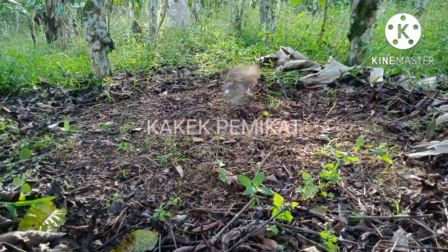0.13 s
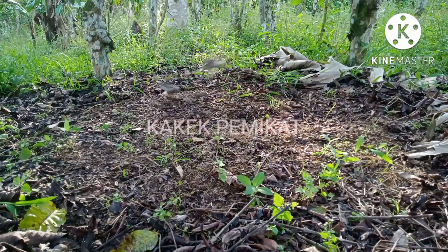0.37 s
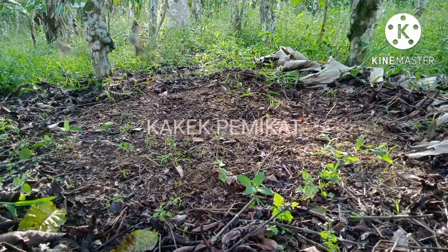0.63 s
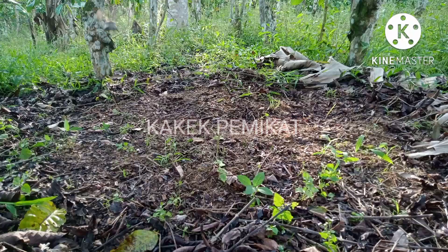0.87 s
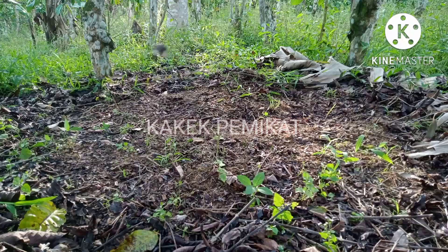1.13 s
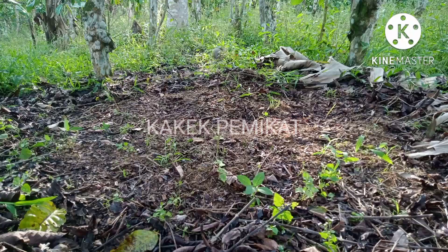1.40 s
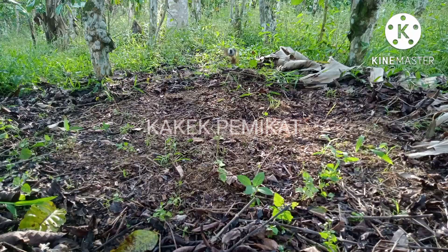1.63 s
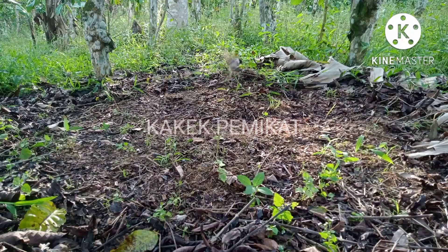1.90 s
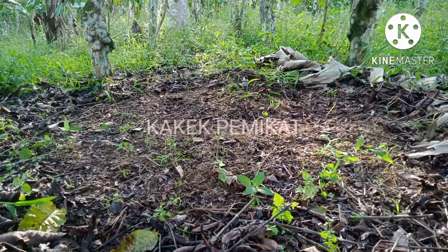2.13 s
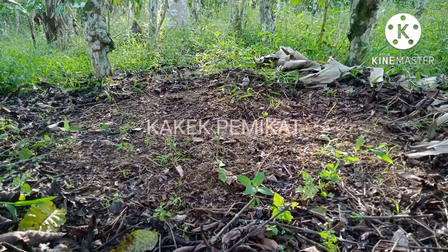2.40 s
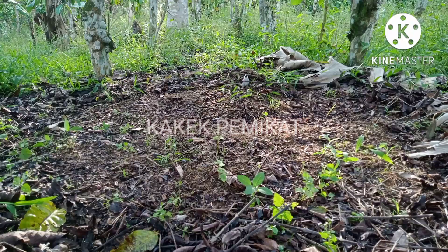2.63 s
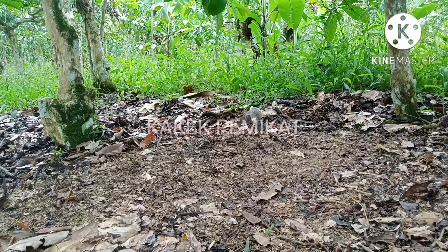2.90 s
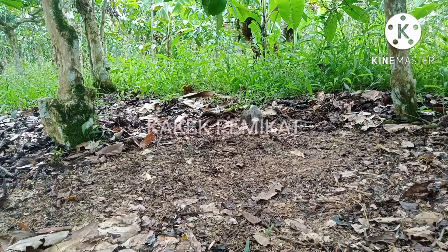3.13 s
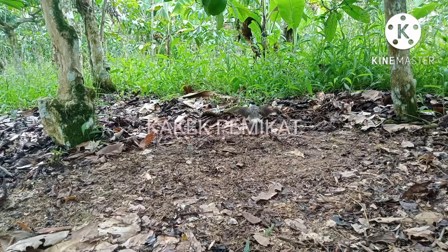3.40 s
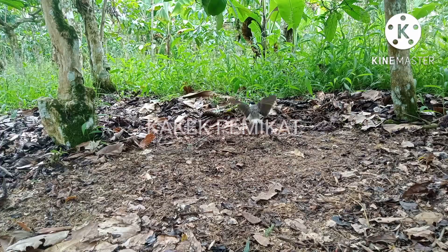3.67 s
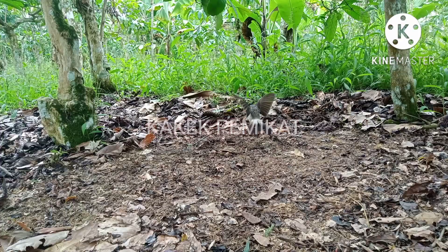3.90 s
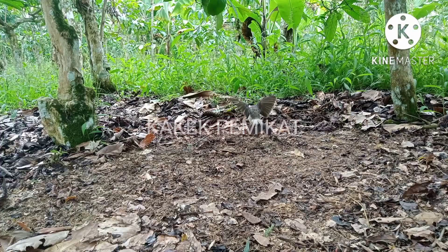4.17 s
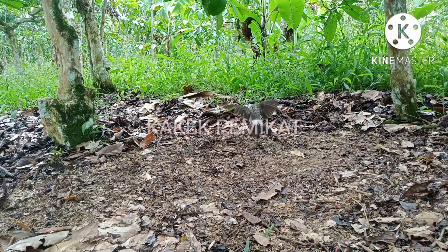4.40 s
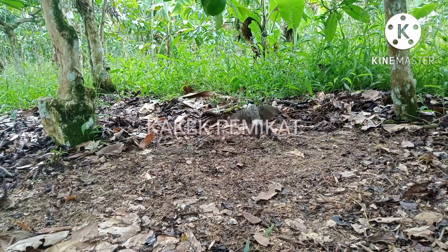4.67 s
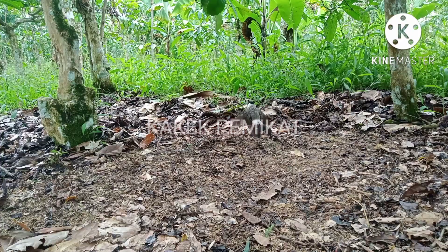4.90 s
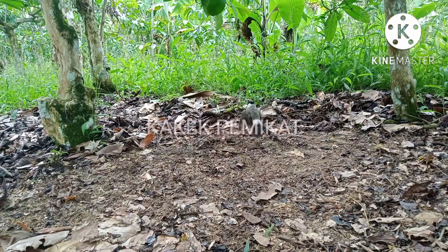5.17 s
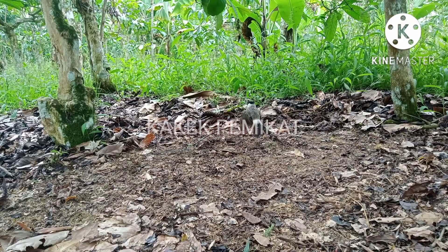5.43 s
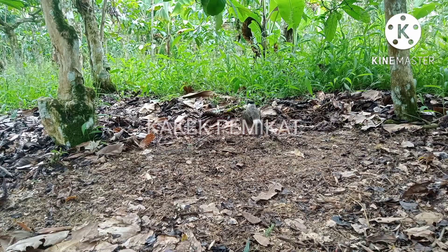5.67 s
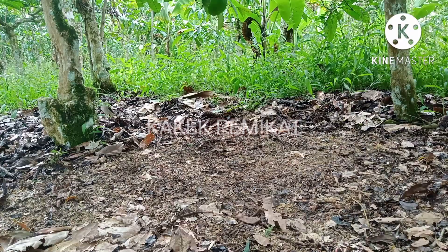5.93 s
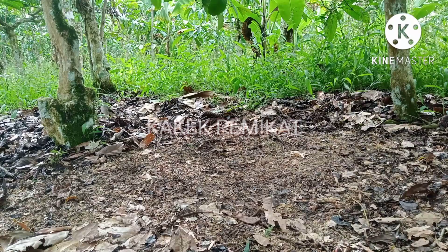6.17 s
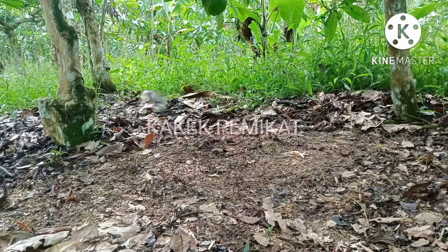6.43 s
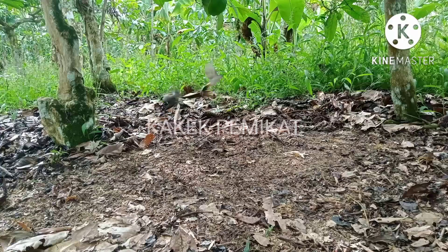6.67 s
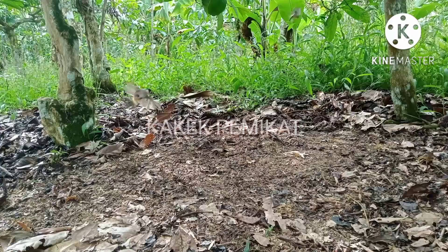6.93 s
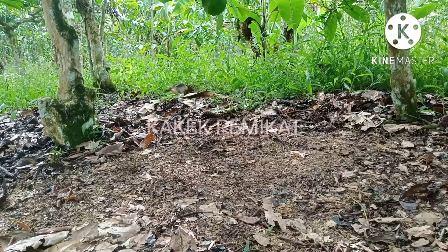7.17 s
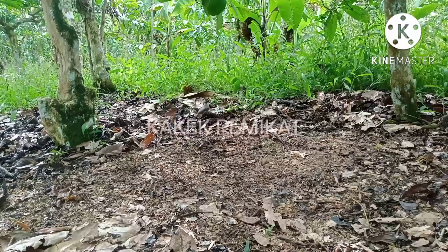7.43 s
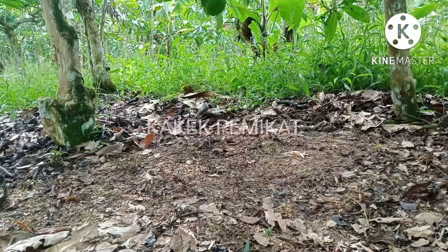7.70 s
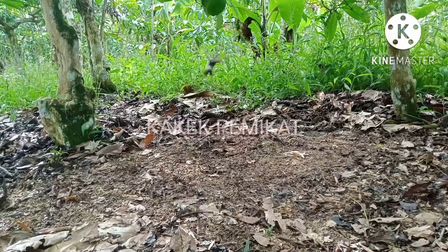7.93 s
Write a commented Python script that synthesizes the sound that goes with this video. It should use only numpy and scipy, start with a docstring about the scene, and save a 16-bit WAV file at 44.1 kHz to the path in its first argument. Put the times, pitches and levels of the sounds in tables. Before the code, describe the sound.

Small birds flutter and chatter harshly in dry leaves, then one sings seven loud sharp whistled phrases before wings flap again, over a distant thumping engine.

```python
"""In a wooded clearing, small birds squabble close to the microphone on dry leaves.
Buzzy chatter is a trilled pitch with a second voice; wings and feet are filtered crackle with decaying beats.
One bird then sings seven loud phrases, made of gliding harmonics shaped by a throat.
Far off, a single-cylinder engine thumps as resonating pulses; other birds whistle in the trees.
Cicadas and the forest wash are shaped noise, and a cricket chirps in pairs of rising pips."""
import sys
import numpy as np
from scipy import signal
from scipy.fft import rfft, irfft, next_fast_len
from scipy.io import wavfile
from scipy.ndimage import uniform_filter1d

SR = 44100
rng = np.random.default_rng(int(sys.argv[2]) if len(sys.argv) > 2 else 0)


def wav_out(sig):
    """Save sig, one row per channel (or a flat mono array), as 16-bit PCM at SR to the path in sys.argv[1]."""
    wavfile.write(sys.argv[1], SR, np.round(np.clip(np.atleast_2d(sig).T, -1, 1) * 32767).astype(np.int16))


def rack_gain(trim_db):
    """Turn a fader trim in dB into the linear factor to multiply a signal by."""
    fader = np.asarray(trim_db, float)
    return 10 ** (fader / 20)


N = 355578  # samples

# background, ahead of any gain: (t/s, forest wash level/dB, cicadas level/dB,
# thin insect lines level/dB, stirring leaves level/dB)
AIR = [(0, -46.5, -50, -50.5, -62), (1, -47.5, -54.5, -53.5, -61), (2.3, -48, -53.5, -51.5, -56.5),
       (2.4, -54, -59.5, -59.5, -79), (2.7, -49, -53, -45, -57.5), (3.15, -45, -50, -60.5, -73),
       (3.25, -60.5, -60, -71, -95.5), (5, -61, -58.5, -68, -94), (5.6, -54, -55.5, -72, -95),
       (6.3, -59, -61, -72, -85), (7.2, -58.5, -60.5, -72.5, -63), (8.06, -58, -62.5, -66, -75)]


def evened(x):
    """Scales to rms 1."""
    return x / np.sqrt(np.mean(x ** 2) + 1e-20)


def read(points, hz):
    """Reads a spectrum on a log frequency axis."""
    f, value = np.transpose(points)
    return np.interp(np.log(hz + 1), np.log(f + 1), value)


def curves(rows, t=None):
    """Columns of a table at the times t, or at every sample of the scene."""
    s, *columns = np.transpose(rows)
    t = np.arange(N) / SR if t is None else t
    return [np.interp(t, s, c) for c in columns]


def add(mix, s, sound):
    """Mixes a sound in at s seconds."""
    part = mix[round(s * SR):][:len(sound)]
    part += sound[:len(part)]


def coloured(x, points):
    """Shapes x by a spectrum."""
    size = next_fast_len(len(x))
    gain = rack_gain(read(points, np.fft.rfftfreq(size, 1 / SR)))
    return irfft(rfft(x, size) * gain, size)[:len(x)]


def resonate(x, hz, width):
    """Shifts hz down to zero, smooths, shifts back: a resonance that may move."""
    turn = np.exp(2j * np.pi * np.cumsum(hz * np.ones(len(x))) / SR)
    r = np.exp(-np.pi * width / SR)
    return 2 * (turn * signal.lfilter([1 - r], [1, -r], x / turn)).real


def wander(length, size):
    """Smooth random drift of rms 1, averaged twice over size samples."""
    smooth = uniform_filter1d(rng.standard_normal(length), size)
    return evened(uniform_filter1d(smooth, size))


def voice(hz, throat, count, fuzz):
    """Harmonics of a moving pitch through the throat; the higher ones flutter."""
    turns = np.cumsum(hz) / SR
    gains = np.array([rack_gain(read(throat, k * hz)) * (k * hz < SR / 2) for k in range(1, count + 1)])
    wave = 0
    for k, gain in enumerate(gains):
        flutter = 1 + fuzz * k * wander(len(hz), size=30)
        wave = wave + gain * np.sin(2 * np.pi * (k + 1) * turns) * flutter
    return wave / np.sqrt((gains ** 2).sum(0) / 2)


def note(rows, rough, count=7, breath_db=10.5):
    """A whistle; rough shakes pitch and level and lets air hiss through the beak."""
    # resonance of the singing throat: (f/Hz, level/dB)
    song_throat = [(1200, -25.5), (1600, -23), (2200, 4.5), (2900, 12), (4200, -0.5), (4800, -14),
                   (5600, -21), (7000, -35.5), (9000, -28.5), (11000, -41), (15000, -43.5)]
    t = np.arange(rows[0][0], rows[-1][0], 1 / SR)
    hz, db = curves(rows, t)
    hz = uniform_filter1d(hz, size=60) * (1 + rough * 0.087 * wander(len(t), size=25))
    wave = voice(hz, song_throat, count=count, fuzz=0.53)
    wave = wave * (1 + rough * wander(len(t), size=40))
    hiss = evened(resonate(resonate(rng.standard_normal(len(t)), 9800, 1900), 8800, 1500))
    sound = wave + rack_gain(breath_db) * rough ** 2 * hiss
    return t[0], rack_gain(db) * sound * signal.windows.tukey(len(t), min(1, 400 / len(t)))


def song():
    """Lead notes scoop up and leap; a loud whistle keeps one shape, stretched anew in each phrase."""
    # lead notes: (t/s, length/s, scoop level/dB, hold level/dB, hold f/Hz, roughness 0-1)
    leads = [(3.123, 0.041, -32.5, -34, 2100, 0.14), (3.163, 0.018, -20.5, -29.5, 1974, .05),
             (3.344, .047, -31.5, -24.5, 2034, 0.15), (3.403, .036, -27, -11, 2956, 0),
             (3.587, 0.053, -23.5, -27.5, 2110, 0.19), (3.647, 0.038, -27.5, -15.5, 2904, 0.08),
             (3.856, 0.046, -23.5, -25.5, 2150, 0.21), (3.921, 0.039, -26, -16.5, 2990, 0.08),
             (4.129, 0.047, -25, -22.5, 2830, 0.23), (4.196, 0.049, -29, -18.5, 2975, 0.02),
             (4.412, 0.057, -23, -24, 2990, 0.25), (4.484, 0.04, -27, -16.5, 2995, 0.09),
             (4.711, 0.042, -25.5, -23.5, 2950, 0.29), (4.778, 0.04, -30, -18.5, 2930, 0),
             (6.261, 0.045, -59, -51.5, 2170, .1)]
    # scoop that opens a lead note: (t into the note/s, f/Hz, level above the scoop level/dB)
    scoop_shape = [(-.003, 1442, -14.5), (.005, 1760, 1), (.013, 2026, -1.5)]
    # shape of the loud whistle: (place: -1 grace note, 0 attack, 1 top, 2 end;
    # pitch as share of the top, level ahead of the effort/dB)
    refrain = [(-1, .525, -31.5), (-.55, .6, -26.5), (-.12, .63, -31.5), (0, .815, -11.5),
               (.15, .895, -9.5), (.4, .74, -18.5), (.54, 0.6, -32.5), (.68, .82, -10.5), (.83, 0.97, -8),
               (1.003, 0.99, -11), (1.2, 0.95, -9.5), (1.42, .865, -13), (1.58, .76, -20.5),
               (1.68, .81, -14.5), (1.845, .815, -10.5), (2, 0.68, -26)]
    # phrases: (attack t/s, top t/s, end t/s, top f/Hz, effort level/dB: grace note, top, end)
    refrains = [(3.183, 3.214, 3.272, 3420, -9, 0.47, -5.5), (3.445, 3.464, 3.507, 3370, -5, 0, 1.5),
                (3.707, 3.734, 3.788, 3473, -2, 0.62, 0), (3.984, 4.008, 4.063, 3480, 0.5, 0.54, -2),
                (4.264, 4.287, 4.345, 3466, -0.5, 0.13, -2), (4.547, 4.573, 4.633, 3437, -1.5, 0.72, -1.5),
                (4.844, 4.867, 4.925, 3470, -0.5, -0.5, 3.5)]
    leap_s, hold, sag = .016, .72, .76  # hold: share of the length; sag: share of the hold pitch
    droop_db, fade_db = -2, -16
    grace_s, leap_gap_s = .026, .003  # both ahead of the attack
    out = np.zeros(N)
    for s, length, scoop_db, hold_db, hz, rough in leads:
        scoop = [(s + late, low_hz, scoop_db + db) for late, low_hz, db in scoop_shape]
        held = [(s + leap_s, hz, hold_db), (s + hold * length, hz, hold_db + droop_db)]
        ending = [(s + length, sag * hz, hold_db + fade_db)]
        add(out, *note(scoop + held + ending, rough))
    place, share, shape_db = np.transpose(refrain)
    for attack, top, end, top_hz, grace_db, effort_db, end_db in refrains:
        s = np.interp(place, np.arange(-1, 3), [attack - grace_s, attack, top, end])
        effort = np.interp(s, [attack - leap_gap_s, attack, top, end],
                           [grace_db, effort_db, effort_db, end_db])
        add(out, *note(np.transpose([s, share * top_hz, shape_db + effort]), rough=0.05))
    return out


def arch(place, top):
    """0 at the top, 1 at both ends of a note."""
    return np.where(place < top, 1 - place / top, (place - top) / (1 - top))


def buzzy_call(rows, depth, steady, trill_hz=128, rough=.06):
    """Pitch trills, loudest at the top of each swing; a second voice and breath ride along."""
    # resonance of the chattering throat: (f/Hz, level/dB)
    chatter_throat = [(800, -38), (1200, -13.5), (1900, -6), (2500, -8), (3700, 3), (4500, -11.5),
                      (5400, -5), (6800, -13.5), (8800, -8.5), (11000, -23), (15000, -36.5)]
    t = np.arange(rows[0][0], rows[-1][0], 1 / SR)
    db, hz, second_db = curves(rows, t)
    trill = trill_hz * (1 + 0.052 * wander(len(t), size=300))
    swing = np.cos(2 * np.pi * (np.cumsum(trill) / SR + rng.random()))
    scoop = 1 - .12 * np.exp(-(t - t[0]) / .025)  # each call slides up into its pitch
    # the second partial is the loudest one, hence half its frequency
    pitch = hz / 2 * scoop * (1 + depth * (swing - .8) + 0.014 * wander(len(t), size=30))
    wave = voice(pitch, chatter_throat, count=7, fuzz=0.09)
    # the second voice lies between the first two partials
    wave = wave + rack_gain(second_db) * voice(1.46 * pitch, chatter_throat, count=1, fuzz=0)
    breath = coloured(rng.standard_normal(len(t)), chatter_throat)
    sound = ((1 - rough) * evened(wave) + rough * evened(breath)) * (steady + swing)
    return t[0], rack_gain(db) * evened(sound) * signal.windows.tukey(len(t), .3)


def short_call(s, length, top_db, top_hz, ends_db, second_db):
    """Effort swells and drops while the pitch climbs; rows as for the long call."""
    top, climb, roundness = .62, .06, 2.24  # top: share of the length; rounder holds the top longer
    second_stands = 0.86  # how far the second voice holds its level as the first fades
    place = np.linspace(0, 1, num=21)
    fade_db = ends_db * arch(place, top) ** roundness
    hz = top_hz * (1 + climb * (place - top))
    return np.transpose([s + length * place, top_db + fade_db, hz, second_db - second_stands * fade_db])


def squabble():
    """Buzzy chatter close by: one drawn-out call, then short ones, all trilled in pitch and level."""
    # the drawn-out call: (t/s, level/dB, loudest partial f/Hz, second voice level above it/dB)
    scold = [(.18, -29.5, 3254, -0.5), (.22, -25, 3570, -15.5), (.238, -27, 3710, -12),
             (.252, -16, 3870, -15), (.32, -26, 3740, -2), (.335, -15.5, 3830, -16),
             (.36, -13.5, 4006, -8.5), (.375, -38, 3800, -6)]
    # short calls: (t/s, length/s, top level/dB, loudest partial f/Hz,
    # ends level relative to the top/dB, second voice level above the first at the top/dB)
    short_calls = [(0.419, .035, -23.5, 3830, -25.5, -13), (.725, 0.091, -23.5, 3420, -19, -9),
                   (0.943, .115, -26, 3640, -15.5, -13), (1.519, 0.15, -37, 3320, -2.5, -9.5),
                   (1.703, 0.11, -35, 3260, -3.5, -5), (1.845, .05, -41, 3450, -3.5, -10),
                   (1.968, 0.11, -33.5, 3300, -11, -15), (2.081, .085, -30.5, 3440, -7, -16),
                   (2.667, .09, -34, 3380, -6, -18), (2.769, .085, -35, 3336, -1, -22)]
    out = np.zeros(N)
    add(out, *buzzy_call(scold, depth=.16, steady=1.4))
    for row in short_calls:
        add(out, *buzzy_call(short_call(*row), depth=.12, steady=2.4))
    return out


def rustle():
    """Wings and feet in dry leaves: dense crackle in clumps, a low push of air, and single beats."""
    # colour of the dry leaves: (f/Hz, level/dB)
    leaves = [(240, -26), (400, -5), (763, -14.5), (1330, -15), (2870, -3), (6470, -9.5), (9370, -2),
              (15800, -14.5)]
    # flurries of wings, ahead of the gains below: (top t/s, level/dB, swell/dB per s, fade/dB per s)
    flurries = [(.001, -43.5, 900, 475), (.3, -40.5, 64, 22), (.5, -32.5, 550, 264), (.56, -42, 90, 8),
                (6.49, -50, 280, 110), (6.58, -37.5, 630, 380), (6.63, -31.5, 634, 170),
                (6.7, -34.5, 380, 75), (6.93, -35, 68.5, 85.5), (7.1, -47, 39, 108), (7.46, -47, 482, 456),
                (7.97, -47, 598, 117)]
    # single wing beats, ahead of the gains below: (t/s, starting level/dB)
    snaps = [(0.1501, -31.5), (0.3238, -26), (0.378, -25), (0.3975, -29), (0.4856, -25.5), (0.5415, -23),
             (0.629, -34.5), (0.6878, -33.5), (1.0701, -36), (1.4905, -37.5), (5.7844, -47),
             (6.6216, -29.5), (6.6894, -28), (6.7889, -41.5), (6.9125, -31), (6.9399, -34), (7.4614, -37.5),
             (7.6076, -52)]
    first_ends_s, stop_db_per_s = .76, 148  # the first scuffle breaks off
    snap_t60 = 0.023  # s
    t, db = np.arange(N) / SR, curves(AIR)[3]
    for s, top_db, swell, fade in flurries:
        stop_db = stop_db_per_s * np.maximum(t - first_ends_s, 0) * (s < first_ends_s)
        slope_db = np.where(t < s, swell * (s - t), fade * (t - s))
        db = np.maximum(db, top_db - slope_db - stop_db)
    gain = rack_gain(db + 2.4 * wander(N, size=400))
    # on average 4000 grains per s, each a short decaying burst
    grains = rack_gain(2.4 * np.minimum(rng.exponential(1, N), 5)) * (rng.random(N) < 4000 / SR)
    grains = signal.oaconvolve(grains, rng.standard_normal(200) * rack_gain(-.25 * np.arange(200)))[:N]
    crackle = evened(coloured(0.29 * evened(grains) + rng.standard_normal(N), leaves))
    push = evened(resonate(rng.standard_normal(N), 520, 650))
    beats, tick = np.zeros(N), np.arange(0, .12, 1 / SR)
    for s, start_db in snaps:
        add(beats, s, rack_gain(start_db - 60 * tick / snap_t60))
    return (rack_gain(5.0) * gain + beats) * crackle + (rack_gain(-2) * gain + rack_gain(-1.5) * beats) * push


def claps():
    """Hollow claps: air caught under a wing rings briefly."""
    # claps: (t/s, level ahead of the 4 ms rise and the decay/dB)
    wing_claps = [(.49, -30), (.6, -29.5), (6.575, -34), (6.622, -24)]
    ring_hz, t60 = 680, .06  # Hz, s
    t, out = np.arange(0, .1, 1 / SR), np.zeros(N)
    for s, level_db in wing_claps:
        puff = resonate(resonate(rng.standard_normal(len(t)), ring_hz, 260), ring_hz, 260)
        add(out, s, rack_gain(level_db - 60 * t / t60) * np.minimum(t / .004, 1) * evened(puff))
    return out


def engine():
    """Each firing, a little uneven, rings the exhaust pipe low and high; a blur of echoes fills the gaps."""
    # speed: (t/s, firings per s)
    firing_rate = [(0, 28.86), (.5, 24.9), (.7, 19.02), (1.2, 19.48), (1.7, 24.62), (2.1, 21.97),
                   (2.35, 21.28), (2.7, 27.73), (2.9, 23.07), (3.1, 31.65), (3.7, 28.57), (3.9, 22.94),
                   (4.3, 23.98), (4.5, 20.45), (5, 22.25), (5.3, 28.84), (5.5, 24.5), (5.8, 23.68),
                   (6.3, 18.33), (8.07, 18.9)]
    # level and ring: (t/s, thump level/dB, bark of the pipe level above it/dB, thump f/Hz)
    pipe = [(0, -30.5, -10, 116), (.75, -35, -2.5, 117), (1.31, -39.5, -7, 124), (1.35, -33, -1.5, 123),
            (2, -31.5, -8.5, 125), (2.33, -31, -11.5, 122), (2.39, -39, -4, 125), (2.65, -34.5, -2.5, 137),
            (2.95, -26.5, -13, 150), (3.45, -37, -17.5, 153), (4.42, -41, -27.5, 131),
            (4.5, -45.5, -15, 131.6), (5.05, -46, -17, 131.4), (5.08, -31, -6, 149.4),
            (5.25, -36.5, -18.5, 128.5), (5.6, -36.5, -17.5, 130), (5.68, -35, -5.5, 129),
            (5.85, -38.5, -18, 128.4), (6.05, -48, -10.5, 123.7), (6.55, -49, -5, 119.6),
            (6.62, -36, -7, 120), (6.95, -41.5, -7, 120), (7.25, -48, -8, 119), (8.06, -52, -8, 119.6)]
    first_turn = .48  # share of a firing cycle already past at the start
    speed = curves(firing_rate)[0]
    at = np.flatnonzero(np.diff(np.floor(first_turn + np.cumsum(speed) / SR)))
    chance = rng.standard_normal((len(at), 2))
    late = (30 * chance[:, 0]).astype(int)  # samples
    blows = np.zeros(N)
    blows[np.clip(at + late, 0, N - 1)] = rack_gain(3.0 * chance[:, 1])
    blows = evened(blows) + 0.74 * rng.standard_normal(N)
    db, bark_db, hz = curves(pipe)
    thump, bark = blows, blows
    for _ in range(3):
        thump, bark = resonate(thump, hz, 112.3), resonate(bark, 266.5, 92)
    return rack_gain(db) * (evened(thump) + rack_gain(bark_db) * evened(bark))


def whistle(s, length, from_hz, middle_hz, to_hz, db):
    """A gliding note from far off: only the fundamental carries."""
    edge_db, top = -4.5, .4  # it swells to its top at this share of its length
    place = np.linspace(0, 1, num=9)
    hz = np.polyval(np.polyfit([0, .5, 1], [from_hz, middle_hz, to_hz], deg=2), place)
    rows = np.transpose([s + length * place, hz, db + edge_db * arch(place, top)])
    return note(rows, rough=0.3, count=1, breath_db=-21)


def far_birds():
    """Other birds whistle farther off in the trees, each note a curved glide in pitch."""
    # notes: (t/s, length/s, start f/Hz, middle f/Hz, end f/Hz, top level ahead of the mix/dB)
    far_notes = [(1.2, 0.048, 3800, 3900, 4000, -51), (1.295, 0.037, 2000, 2800, 2780, -55.5),
                 (1.47, .02, 2280, 2570, 2747, -49), (3.017, 0.091, 735, 737, 740, -60.5),
                 (3.09, 0.08, 2560, 2540, 2553, -46), (4.38, 0.032, 1910, 2350, 2800, -41.5),
                 (4.43, 0.067, 3060, 3100, 2614, -38.5), (4.68, 0.031, 2865, 2813, 2810, -30.5),
                 (4.745, 0.042, 3465, 3370, 3240, -30.5), (4.81, .028, 3360, 3173, 3120, -26),
                 (4.965, 0.026, 2670, 2150, 1470, -44), (5.135, 0.092, 4250, 4300, 4260, -61.5),
                 (5.18, 0.096, 3525, 3680, 3550, -56.5), (5.275, 0.061, 3110, 2950, 2830, -55.5),
                 (5.39, .11, 3250, 3225, 3110, -52.5), (5.51, .13, 2420, 2550, 2330, -57),
                 (6.127, 0.11, 714, 727, 720, -69)]
    out = np.zeros(N)
    for row in far_notes:
        add(out, *whistle(*row))
    return out


def cricket(hz=6270, length=0.012, gap=0.0228, peak_db=-43):
    """Chirps of two short pips, each rising from hz."""
    # chirps: (t/s)
    chirps = [0.063, .156, .575, .696, .799, .891, 1.087, 1.18, 1.26, 1.363, 1.444, 1.546, 1.664, 1.823,
              1.915, 2.178, 2.271, 2.362, 2.455, 2.547, 2.638, 2.903, 2.993]
    t = np.arange(0, length, 1 / SR)
    wave = np.sin(2 * np.pi * hz * t * (1 + 1.7 * t))
    pip = rack_gain(peak_db) * wave * signal.windows.tukey(len(t), .9)
    out = np.zeros(N)
    for s in chirps:
        add(out, s, pip)
        add(out, s + gap, pip)
    return out


def air():
    """Forest wash with drifting patches, a band of far cicadas that shimmers, two thin insect lines."""
    # colour of the forest wash: (f/Hz, level/dB)
    wash_colour = [(60, -2.5), (150, -11.5), (370, -2.5), (630, -13.5), (1200, -9), (2800, -10),
                   (5800, -24), (9000, -21.5), (10900, -34), (15800, -33)]
    patchy_db = 2.0  # rms
    wash_db, cicada_db, line_db = curves(AIR)[:3]
    frames, hz = N // 256 + 5, np.fft.rfftfreq(1024, 1 / SR)
    a, b, patches = rng.standard_normal((frames, 513, 3)).T
    # patches spread over neighbouring frequencies, then over time
    patches = evened(uniform_filter1d(uniform_filter1d(patches, 10, axis=0), 12, axis=1))
    spectrum = (a + 1j * b) * rack_gain(read(wash_colour, hz)[:, None] + patchy_db * patches)
    wash = signal.istft(spectrum, nperseg=1024, noverlap=768)[1][:N]
    band, noise = rng.standard_normal((2, N))
    for _ in range(3):
        band = resonate(band, 9220, 960)
    lines = np.zeros(N)
    for f in (3650, 4480):
        lines += resonate(resonate(noise, f, 250), f, 250) * rack_gain(3 * wander(N, size=1500))
    cicadas = rack_gain(cicada_db + 1.2 * wander(N, size=60)) * evened(band)
    return rack_gain(wash_db) * evened(wash) + cicadas + rack_gain(line_db) * evened(lines)


def trees(x, t60=0.33, ground_db=10.0, ground_t60=0.067):
    """Scattered echoes: a quick strong cluster off the ground, a longer tail off trunks."""
    t = np.arange(SR // 2) / SR
    fade = rack_gain(-60 * t / t60) + rack_gain(ground_db - 60 * t / ground_t60)
    taps = rng.standard_normal(len(t)) * (rng.random(len(t)) < .06) * fade * (t > .002)
    return signal.fftconvolve(x, taps / np.linalg.norm(taps))[:N]


def scene():
    """Near birds with their echoes, far birds wetter, over engine and forest."""
    near, far = song() + squabble(), far_birds()
    echoes = trees(rack_gain(-7.0) * near + rack_gain(3.5) * far)
    birds = near + rack_gain(4.0) * far + echoes
    return (birds + rustle() + claps() + engine() + cricket() + air())[None]


def band_limit(x):
    """A steep low-pass at the top of the band."""
    return signal.sosfilt(signal.butter(12, 16480, fs=SR, output="sos"), x)


def record(dry):
    """The microphone drops deep bass; the loudest notes overload it a little."""
    ceiling = .74  # of full scale
    dry = signal.sosfilt(signal.butter(2, 55, "high", fs=SR, output="sos"), dry)
    mix = dry / (1 + abs(dry / ceiling) ** 6) ** (1 / 6)
    return band_limit(mix)


dry = scene()
out = record(dry)
wav_out(out)
```